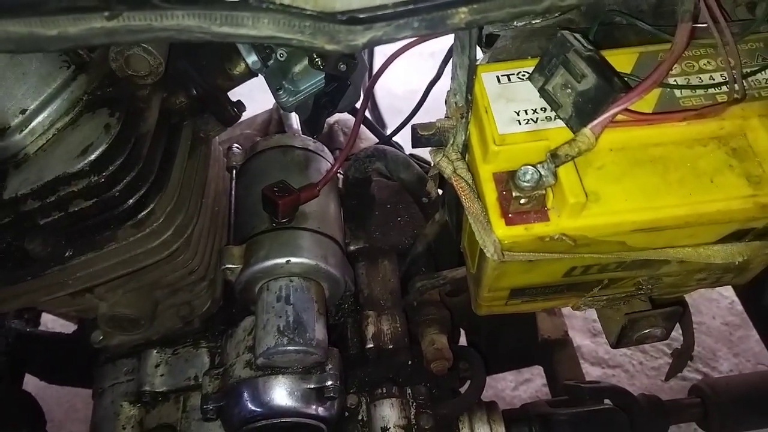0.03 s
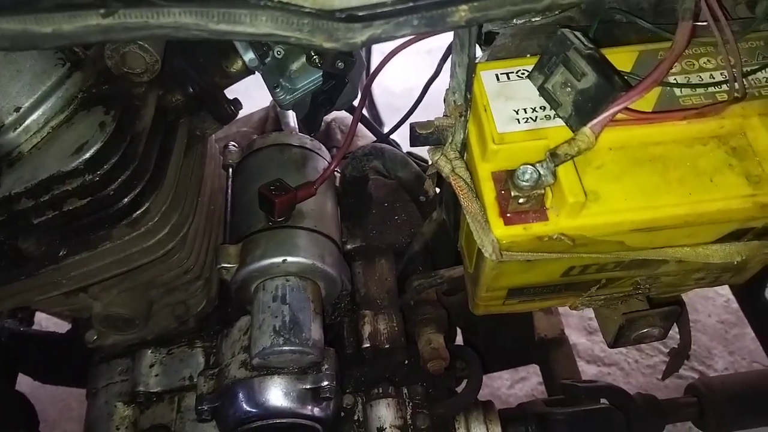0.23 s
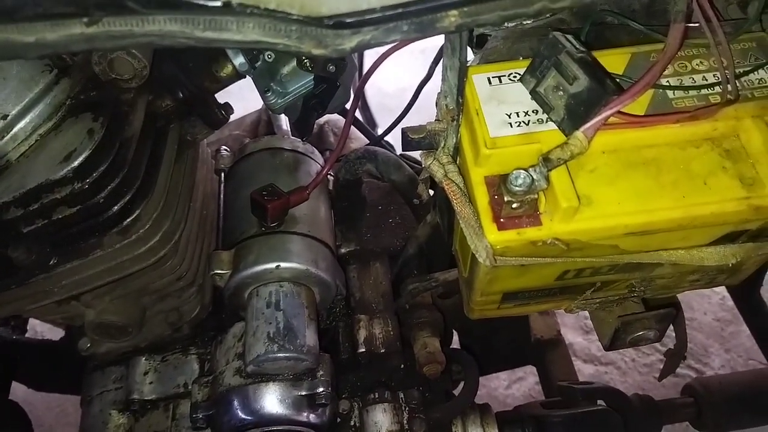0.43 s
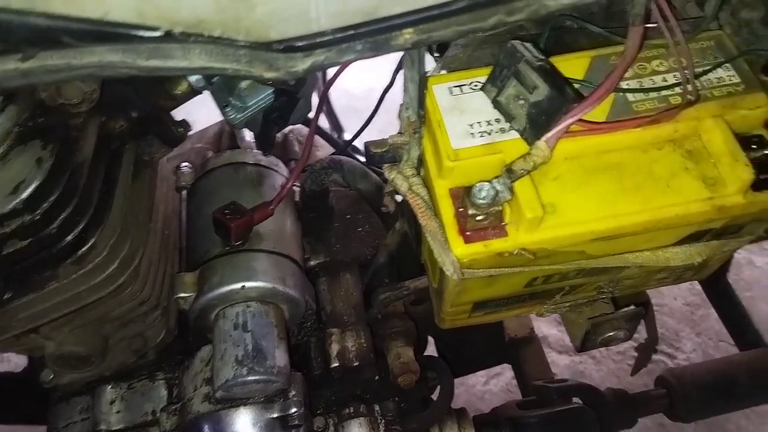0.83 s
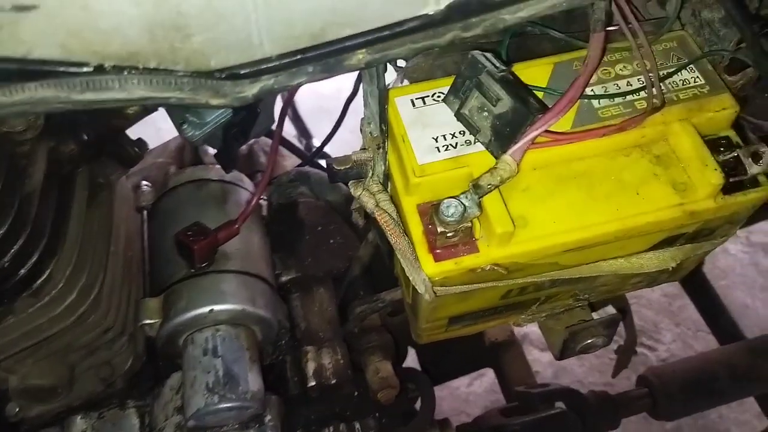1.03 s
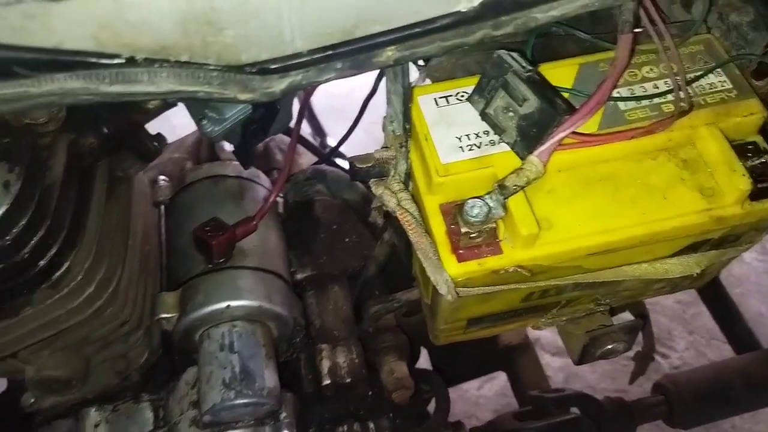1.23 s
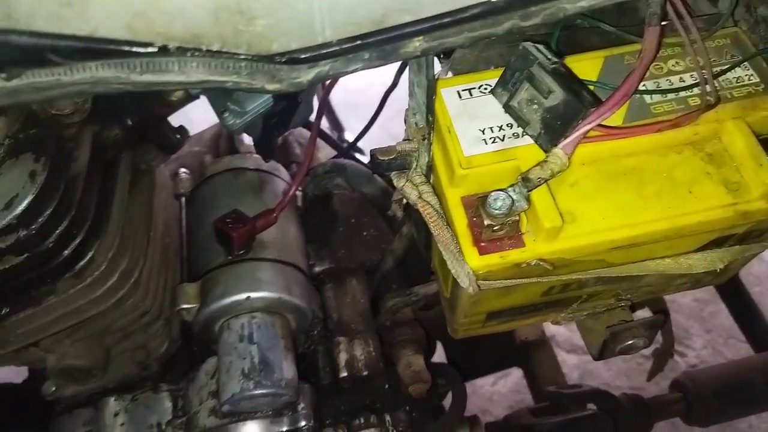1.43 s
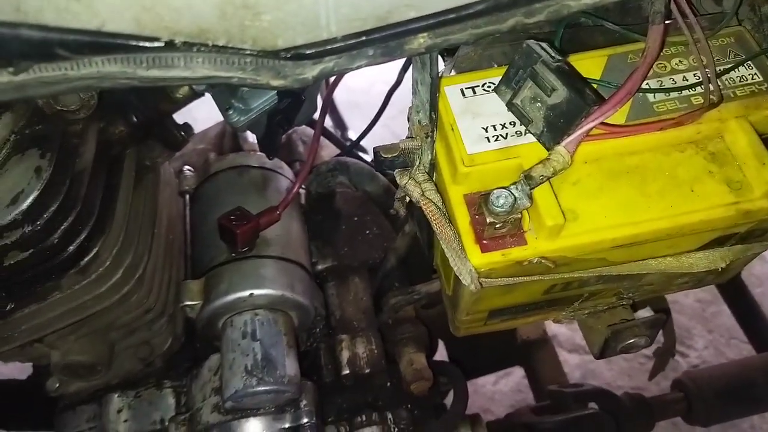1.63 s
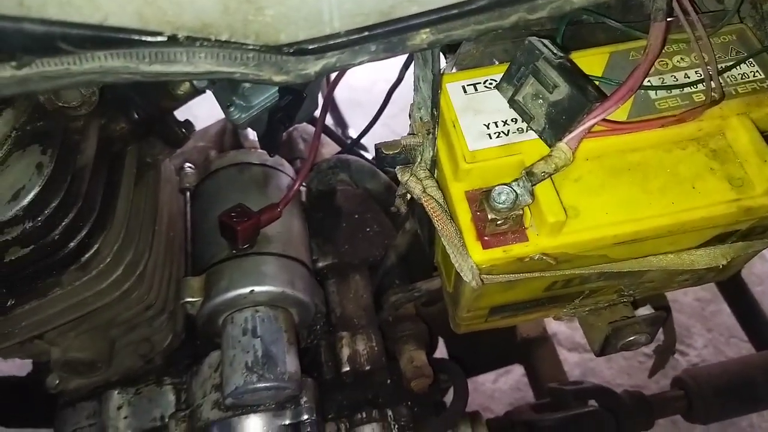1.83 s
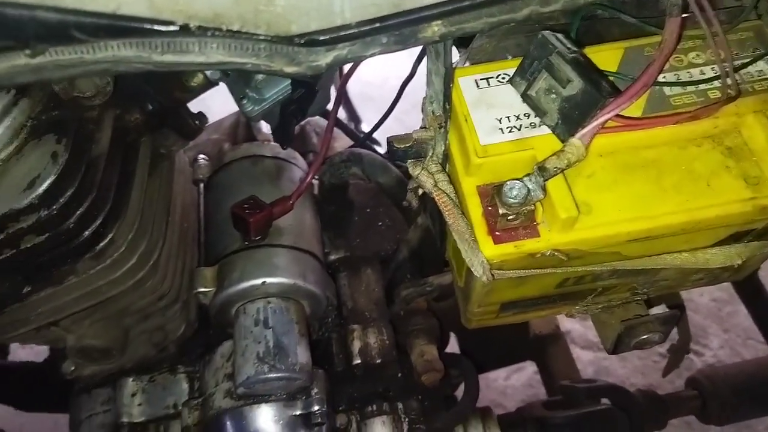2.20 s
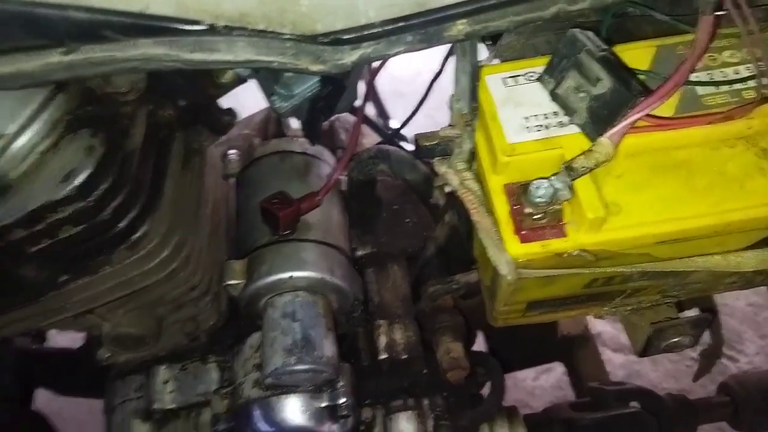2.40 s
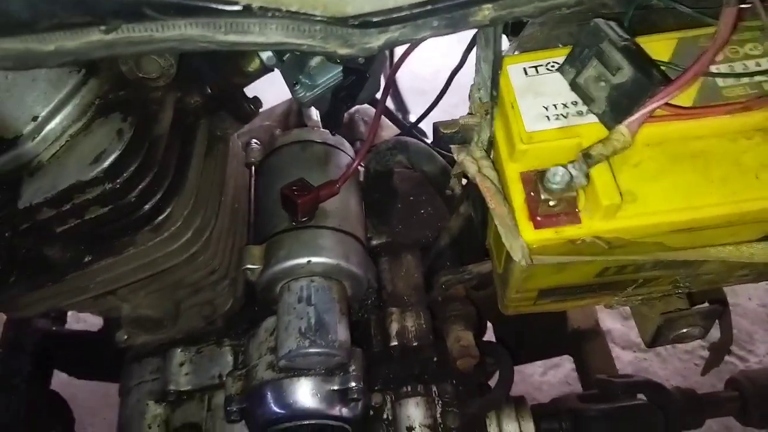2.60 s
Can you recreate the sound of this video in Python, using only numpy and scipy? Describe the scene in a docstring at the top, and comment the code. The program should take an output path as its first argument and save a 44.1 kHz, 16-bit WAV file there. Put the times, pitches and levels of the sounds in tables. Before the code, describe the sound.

One sharp metallic clack from a starter solenoid in a quiet workshop.

```python
"""A starter solenoid snaps shut once in an open engine bay; the engine does not turn.
The impact of its steel plunger excites the modes of the can and the frame, and a small workshop
reverberates briefly. Faint knocks and fast treble ticking lie over a low rumble, hiss and distant
hums, with one soft bump and a rustle. At the end a finger taps the camera."""
import sys
import numpy as np
from scipy import signal
from scipy.fft import irfft
from scipy.io import wavfile
from scipy.ndimage import uniform_filter1d

SR = 44100
rng = np.random.default_rng(int(sys.argv[2]) if len(sys.argv) > 2 else 0)


def materialize(psi):
    """Save the field psi as 16-bit PCM at rate SR to the path in sys.argv[1].

    A 1-D psi becomes a single channel; in a 2-D psi each row is a channel.
    """
    bounded = np.clip(np.atleast_2d(psi).T, -1, 1)
    quanta = np.round(bounded * 32767).astype(np.int16)
    wavfile.write(sys.argv[1], SR, quanta)


N = 121275
TIME = np.arange(N) / SR
PING_HZ = 8800  # strongest mode of the steel
# spectrum of a hard contact (frequency [Hz], density [dB])
CRACK_SPECTRUM = [(40, -44), (300, -18.5), (1500, 0.5), (4300, -3), (4950, -6.5), (6000, -3.5), (7100, -11),
                  (8400, -0.5), (10000, -2.5), (15000, -3.5)]


def solenoid():
    """Impact radiation: plunger, can and frame sound directly and drive the room's reverberant field."""
    early_tick = strike(TIME - .1705, rise=.001, t60=.035)  # a faint tick just before the clack
    cracks, steel, frame = plunger_cracks(early_tick), steel_ring(), frame_response(early_tick)
    left, right = (cracks + steel) * pan(1.5) + frame * pan(-11.5)
    out = np.array([left, np.roll(right, round(.0005 * SR))])
    echo = room(rise=.0095)
    echo /= np.linalg.norm(echo[0])
    # the steel's ring is quieter in the echo than in the direct clack
    radiated = (cracks + frame + amp(-5.5) * steel)[:1]
    add(out, .004, amp(-5.5) * signal.fftconvolve(radiated, echo, axes=1))
    return out


def plunger_cracks(early_tick):
    """Impact noise: the plunger slams and bounces, and each brief contact has a broad spectrum."""
    # the slam and its bounces (time [s], relative level [dB])
    blows = [(0.2016, -5), (0.2035, -1), (0.2045, 0.5), (0.2088, -6.5)]
    lead_in = amp(-25) * np.exp(-abs(TIME - .2015) / .0028)  # a brief swell of noise into the clack
    impacts = sum(amp(db - 16.5) * strike(TIME - s, rise=.0002, t60=.015) for s, db in blows)
    return noise(CRACK_SPECTRUM) * (lead_in + impacts + amp(-42) * early_tick)


def steel_ring():
    """Free vibration: the slam leaves can and plunger ringing at their natural frequencies."""
    # steel modes (frequency [Hz], relative level [dB], T60 [s])
    modes = [(4250, -22.5, 0.037), (4490, -28, 0.076), (6100, -27, 0.045), (7760, -28, 0.03),
             (8450, -18.5, 0.016), (PING_HZ, -7.5, .016), (9600, -22, 0.037), (9400, -26, .035),
             (10000, -21.5, .035), (12580, -24, .03), (11000, -22, 0.025), (14350, -28, .03)]
    out = np.zeros((2, N))
    add(out, .2034, amp(-1.5) * ring(modes, rise=.00078))
    return out


def frame_response(early_tick):
    """Structure-borne sound: the frame that carries the solenoid clunks and rings in lower modes."""
    # frame modes (frequency [Hz], relative level [dB], T60 [s])
    modes = [(367.3, -38, 0.25), (500, -33.5, 0.03), (658, -22, 0.045), (722, -38.5, 0.23),
             (1299, -21.5, 0.04), (1540, -25.5, 0.045), (1635, -27, 0.087), (1824, -28.5, 0.037),
             (2045, -38, 0.22), (2325, -30, 0.03), (2570, -30, .06), (2668, -28.5, 0.032),
             (2985, -27, 0.035), (3624, -29.5, 0.059)]
    # clunk spectrum (frequency [Hz], density [dB])
    clunk = [(40, -45), (250, -26), (650, 5), (1050, 2.5), (1550, 0), (4400, -4), (7000, -19)]
    onset_s = .2056
    blow = amp(-29) * strike(TIME - onset_s, rise=.0027, t60=.013)
    out = noise(clunk) * (blow + amp(-45) * early_tick)
    add(out, onset_s, amp(-1) * ring(modes, rise=.0027))
    return out


def knocks():
    """Damped impacts around the engine: each has a dull body, a crisp edge and a reverberant tail."""
    # knocks (time [s], level [dB], edge relative to body [dB])
    hits = [(0.017, -43.5, -24), (0.079, -47.5, -11), (0.334, -36, -19), (.565, -40, -11),
            (0.61, -47.5, -14), (0.69, -48.5, -7)]
    # body spectrum (frequency [Hz], density [dB])
    spectrum = [(60, -33), (800, -17), (1450, 5), (2300, -4.5), (3000, -14), (3900, -13), (6000, -30)]
    out, body, edge = np.zeros((2, N)), noise(spectrum), noise(CRACK_SPECTRUM)
    for s, db, edge_db in hits:
        out += amp(db) * body * strike(TIME - s, rise=.0042, t60=.065)
        out += amp(db + edge_db) * edge * strike(TIME - s, rise=.001, t60=.036)
        add(out, s, amp(db - 12.5) * room(rise=.0095, colour=spectrum))
    return out * pan(-1.5)


def camera_tap():
    """Impact of a finger on the camera: a bright contact tick, then the slower decay of the case."""
    # spectra of tick and case (frequency [Hz], density [dB])
    tick_spectrum = [(500, -20), (5000, -15), (6300, -1), (8000, -0.5), (12000, 4), (15000, -1)]
    case_spectrum = [(100, -4), (400, 5), (2200, 4), (12000, -28)]
    age = TIME - 2.723
    tick = amp(-36.5) * noise(tick_spectrum) * strike(age, rise=.0013, t60=.036)
    thud = amp(-40.5) * noise(case_spectrum) * strike(age, rise=.0031, t60=.17)
    return tick + thud


def ticking():
    """Amplitude modulation: a pulse train of drifting rate shapes treble noise into faint ticks."""
    # tick rate (time [s], rate [1/s])
    rate = [(0.0, 20.92), (0.15, 23.36), (0.56, 20.81), (0.7, 27.67), (0.85, 26.17), (1.0, 23.67),
            (1.5, 23.74), (1.68, 22.23), (2.25, 20.82), (2.38, 18.44), (2.6, 21.85)]
    # tick spectrum (frequency [Hz], density [dB])
    spectrum = [(3000, -17), (5500, -15), (6750, 1.5), (7300, -22), (9400, 3), (10000, -12), (10600, 2.5),
                (11200, -23), (11700, 4), (12800, -17), (14200, -0.5), (15000, -16)]
    level_db, spread_db = -62, 2
    cycles = np.cumsum(curve(rate)) / SR
    starts = np.flatnonzero(np.diff(np.floor(cycles + .5)))
    train = np.zeros(N)
    train[starts] = amp(level_db + spread_db * rng.standard_normal(N)[starts])
    pulse = strike(TIME[:SR // 8], rise=.0032, t60=.042)
    return noise(spectrum) * signal.fftconvolve(train, pulse)[:N]


def rumble_and_hiss():
    """Ambient noise: two broad bands in the workshop, each drifting slowly in level."""
    # spectra (frequency [Hz], density [dB])
    rumble = [(0, -58), (36, -47), (62, -19), (100, -9.5), (145, 2.5), (165, -6), (190, -3), (215, -11),
              (265, -7), (400, -16), (520, -18.5), (750, -26), (2500, -65)]
    hiss = [(30, -12), (200, 5.5), (900, 0), (1450, 3.5), (2500, -1.5), (4400, -7.5), (5600, -19),
            (6600, -15), (7200, -22), (9400, -15), (11200, -21.5), (12000, -18.5), (15000, -26)]
    # envelopes (time [s], level [dB])
    rumble_db = [(0, -43), (.5, -43), (1.05, -42), (1.45, -43), (1.7, -40), (1.85, -41.5), (2.36, -39.5),
                 (2.6, -42.5), (2.75, -41.5)]
    hiss_db = [(0, -51), (.65, -49.5), (1.1, -52.5), (2.1, -53), (2.35, -52), (2.75, -53.5)]
    # hiss balance (frequency [Hz], left minus right [dB])
    balance = [(500, 9), (1300, -4), (2400, -4), (5000, 1)]
    return noise(rumble) * amp(curve(rumble_db)) + noise(hiss, balance) * amp(curve(hiss_db))


def hums():
    """Random frequency modulation: distant tones waver in pitch as they come and go."""
    # hums (centre time [s], half width [s], frequency [Hz], level [dB])
    tones = [(1.27, 0.46, 474, -55.5), (1.31, 0.43, 535, -54.5), (1.7, 0.55, 145, -45.5),
             (2.38, .17, 188, -40)]
    out, depth = np.zeros(N), .0184  # rms share of the pitch
    for s, width, hz, db in tones:
        waver = uniform_filter1d(rng.standard_normal(N), size=1200)
        cycles = np.cumsum(hz * (1 + depth * waver / waver.std())) / SR
        out += amp(db) * swell(s, width) * np.sin(2 * np.pi * cycles)
    return out


def bump():
    """A single damped mode, heard as a soft low bump."""
    out, hz, db, t60 = np.zeros((2, N)), 141, -28.5, .089
    add(out, 1.5, ring([(hz, db, t60)], rise=.0075))
    return out


def rustle():
    """High-frequency noise under a smooth envelope, heard as a soft rustle."""
    # rustle spectrum (frequency [Hz], density [dB])
    spectrum = [(1000, -17), (4000, -14), (12000, 1), (15000, -3)]
    return amp(-62.5) * noise(spectrum) * swell(2.325, width=.071)


def room(rise, colour=None):
    """Reverberation: a diffuse tail in which each band decays exponentially at its own rate."""
    # the workshop's colouring of the clack (frequency [Hz], density [dB])
    clack_colour = [(150, -10), (400, 7), (550, -4), (720, 2), (1400, -1.5), (2900, 1.5), (4500, 0.5),
                    (7100, -5), (7700, -0.5), (8300, -9), (9200, 2.5), (11000, -4), (15400, -5.5)]
    # reverberation time (frequency [Hz], T60 [s])
    t60 = [(300, 0.29), (2000, 0.32), (5500, 0.43), (15000, 0.34)]
    hz, t, bands = signal.stft(noise(colour or clack_colour)[:, :SR], SR, nperseg=256)
    decay = np.exp(-np.log(1000) * t / read(t60, hz)[:, None])
    tail = signal.istft(bands * decay, SR, nperseg=256)[1]
    return tail * np.minimum(TIME[:tail.shape[1]] / rise, 1)


def noise(colour, balance=None):
    """Diffuse-field coherence: stereo noise of unit rms, alike on both sides at long wavelengths."""
    # left-right coherence (frequency [Hz], correlation [1])
    coherence = [(130, .97), (300, 0.94), (600, 0.44), (1200, 0.058), (3000, 0.022)]
    hz = np.fft.rfftfreq(N, 1 / SR)
    left, independent = np.exp(2j * np.pi * rng.random((2, len(hz))))
    same = read(coherence, hz)
    right = same * left + np.sqrt(1 - same ** 2) * independent
    spectra = np.array([left, right]) * amp(read(colour, hz))
    x = irfft(spectra * pan(read(balance, hz)) if balance else spectra, N)
    return x / x.std()


def ring(modes, rise):
    """Modal superposition: damped sinusoids of alternating sign."""
    t = TIME[:SR // 4]
    return sum((-1) ** k * amp(db) * strike(t, rise, t60) * np.sin(2 * np.pi * hz * t)
               for k, (hz, db, t60) in enumerate(modes))[None]


def strike(age, rise, t60):
    """Exponential damping after a linear rise: the envelope falls 60 dB in t60 seconds."""
    return np.clip(age / rise, 0, 1) * np.exp(-np.log(1000) * np.maximum(age - rise, 0) / t60)


def swell(s, width):
    """Gaussian envelope around time s."""
    return np.exp(-.5 * ((TIME - s) / width) ** 2)


def amp(db):
    """Decibels to amplitude ratio."""
    return 10 ** (np.asarray(db) / 20)


def read(points, hz):
    """Interpolation of a spectrum on a log-frequency axis."""
    f, value = np.transpose(points)
    return np.interp(np.log(hz + 1), np.log(f + 1), value)


def curve(points):
    """Linear interpolation of a control curve at every sample."""
    return np.interp(TIME, *np.transpose(points))


def pan(db):
    """Level difference, left minus right, as a pair of gains."""
    return amp(np.array([db, -db]).reshape(2, -1) / 2)


def add(mix, s, sound):
    """Superposes a sound on the mix at time s."""
    part = mix[:, max(round(s * SR), 0):][:, :sound.shape[1]]
    part += sound[:, :part.shape[1]]


def scene():
    """Linear superposition of all sources at the two microphones."""
    return solenoid() + knocks() + camera_tap() + ticking() + rumble_and_hiss() + hums() + bump() + rustle()


def record(dry):
    """Band limiting by a linear-phase low-pass filter."""
    cutoff_hz = 15500
    lowpass = signal.firwin(401, cutoff_hz, window=("kaiser", 8), fs=SR)
    return signal.oaconvolve(dry, lowpass[None], "same")


dry = scene()
out = record(dry)
materialize(out)
```